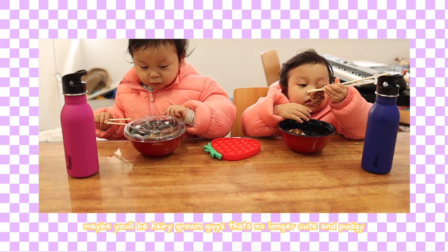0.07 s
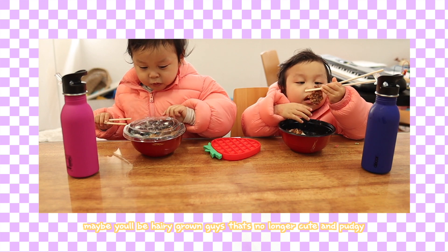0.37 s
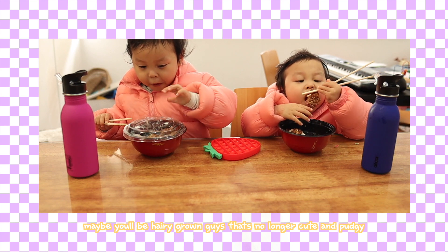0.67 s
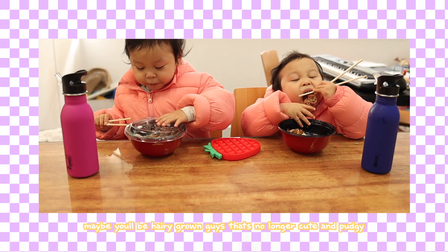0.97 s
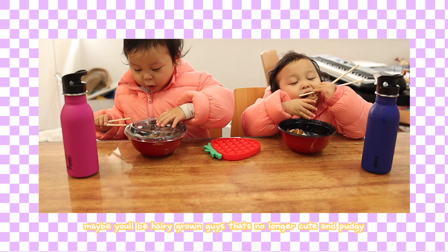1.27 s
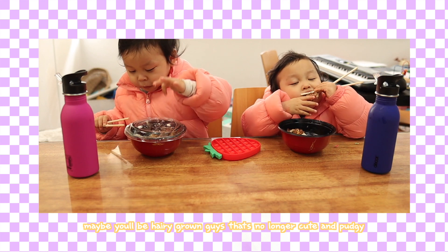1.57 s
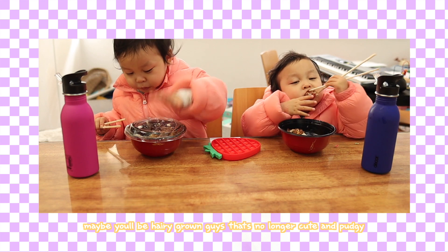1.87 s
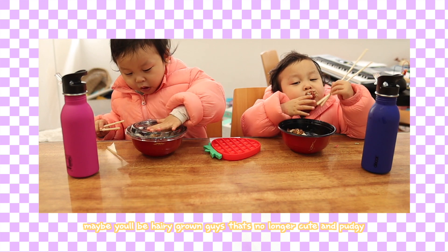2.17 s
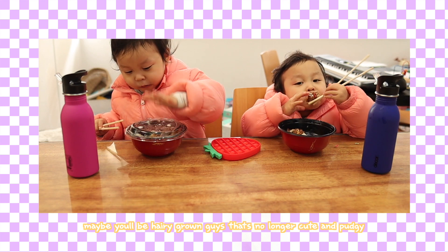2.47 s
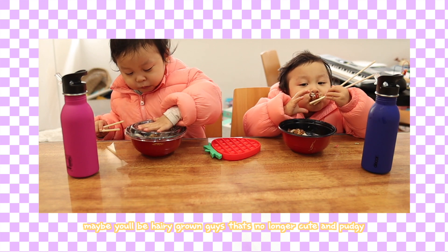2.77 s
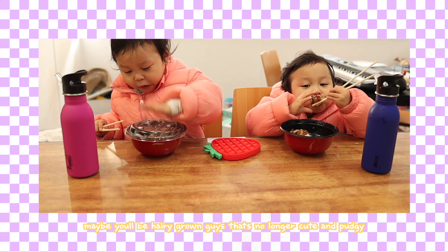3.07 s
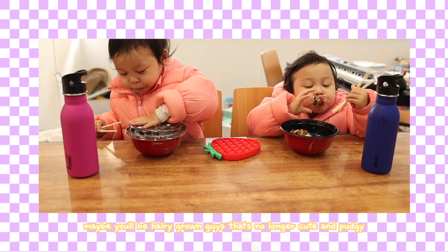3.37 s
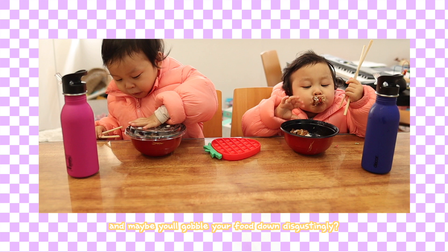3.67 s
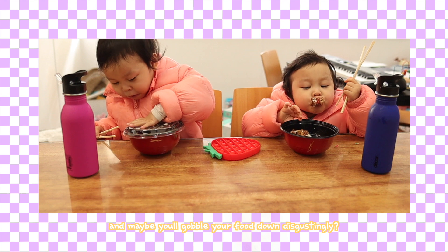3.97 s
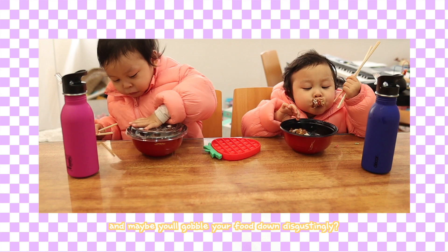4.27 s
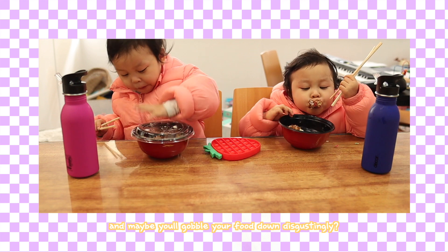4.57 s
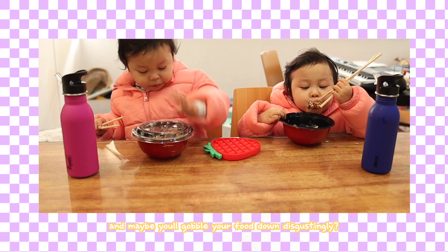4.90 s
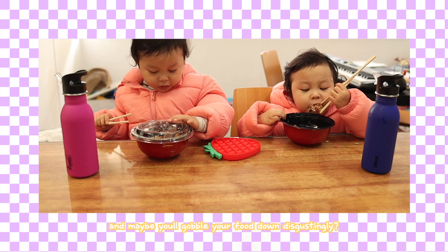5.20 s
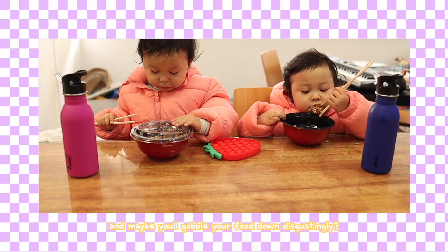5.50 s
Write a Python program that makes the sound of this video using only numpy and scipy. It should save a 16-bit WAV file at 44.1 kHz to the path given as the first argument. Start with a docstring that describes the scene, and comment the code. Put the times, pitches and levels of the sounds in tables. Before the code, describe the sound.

A close microphone picks up a thin plastic lid on a bowl in a small, lively room with faint steady air noise. Fingertips tap and pop the lid at about 0.3 seconds, then tap and scuff it around 1 second, ending in a firmer knock. Small, dry eating clicks fall in between. Loud slaps land at 2.0, 2.7 and 3.3 seconds: each is a plastic crack with a hollow thump from the wooden table and quick after-knocks as the bowl rocks. The second has a buzzing rim rattle. From 3.6 to 4.8 seconds it is quieter, with soft swishes of a padded sleeve, eating clicks and light touches, while a low machine hum rises slightly. A fourth slap at 5.0 seconds crackles a little longer and rattles. Sharp little ticks and chirps follow at 5.2 seconds, then faint squeaks and clicks near 5.6.

```python
"""A small live room, where a child slaps and presses the thin plastic lid of a bowl on a wooden table.
In a slap the fingers land one after another, the lid buckles, the table booms, the bowl rocks back
and the rim rattles. Between slaps fingertips tap and scuff the lid, a padded sleeve swishes and
eating makes small ticks, with faint squeaks over room air and a low machine hum."""
import sys
import numpy as np
from scipy import signal
from scipy.fft import rfft, irfft, next_fast_len
from scipy.io import wavfile
from scipy.ndimage import uniform_filter1d

SR = 44100
rng = np.random.default_rng(int(sys.argv[2]) if len(sys.argv) > 2 else 0)


def transcribe(signal):
    """Save signal, clipped to [-1, 1], as a 16-bit WAV file at the path in sys.argv[1]."""
    frames = np.atleast_2d(signal).T
    limited = np.clip(frames, -1, 1)
    pcm = np.round(limited * 32767).astype(np.int16)
    wavfile.write(sys.argv[1], SR, pcm)


N = 253134
T = np.arange(N) / SR
NOTE_T60_S = 0.27  # the low note ringing after a hit: the bowl's hollow tone or the table's boom

# light fingertip touches, each a tap and a scuff: start_s, knock_db, knock_hz, crack_db, scuff_db
TOUCHES = [(0.262, -33, 980, -43, -42), (0.279, -25.5, 995, -27, -42), (0.296, -27, 800, -48, -55),
           (0.396, -45, 895, -48, -67), (0.7438, -33.5, 890, -48, -46), (0.931, -36, 620, -39, -34),
           (0.962, -31, 550, -45, -37), (0.9944, -25, 600, -59, -60), (1.022, -32, 660, -47, -56),
           (1.0572, -32, 800, -57, -71), (1.0838, -15.5, 784, -24.5, -59), (1.4425, -34, 475, -67, -62),
           (1.71, -39, 520, -57, -67), (2.2247, -35.5, 800, -35.5, -58), (2.36, -36, 487, -45, -46),
           (2.406, -26, 503, -44, -34.5), (3.037, -33, 470, -56, -36), (3.137, -36, 570, -51, -66),
           (3.825, -38, 644, -61, -53), (4.472, -38, 550, -58, -42), (4.57, -34, 630, -47, -40.5),
           (4.579, -33, 590, -51, -61), (4.702, -27.5, 700, -55, -42.5), (5.0031, -28, 700, -33, -45),
           (5.412, -36, 340, -56.5, -58)]


def undb(db):
    """Decibels to gain."""
    return 10 ** (np.asarray(db) / 20)


def unit(x):
    """Scale to rms 1."""
    return x / np.sqrt(np.mean(x ** 2))


def curve_at(points, hz):
    """Read (Hz, value) points on a log-frequency axis."""
    freqs, values = np.transpose(points)
    return np.interp(np.log(hz + 1), np.log(freqs), values)


def colour(x, points):
    """Minimum-phase EQ along a (Hz, dB) curve: nothing rings ahead of an attack."""
    size = 2048
    cepstrum = irfft(np.log(undb(curve_at(points, np.fft.rfftfreq(size, 1 / SR)))))
    cepstrum[1:size // 2] *= 2
    cepstrum[size // 2 + 1:] = 0
    return signal.fftconvolve(x, irfft(np.exp(rfft(cepstrum))))[:len(x)]


def shade(x, points):
    """Zero-phase EQ along a (Hz, dB) curve."""
    size = next_fast_len(N, True)
    gain = undb(curve_at(points, np.fft.rfftfreq(size, 1 / SR)))
    return irfft(rfft(x, size) * gain, size)[:N]


def resonate(x, hz, q):
    """Two-pole band-pass."""
    w = 2 * np.pi * min(hz, SR / 3) / SR
    a = np.sin(w) / (2 * q)
    return signal.lfilter([a, 0, -a], [1 + a, -2 * np.cos(w), 1 - a], x)


def lowpass(x, hz):
    """Two-pole treble cut."""
    return signal.lfilter(*signal.butter(2, min(hz, SR * .45), fs=SR), x)


def highpass(x, hz):
    """Two-pole bass cut."""
    return signal.lfilter(*signal.butter(2, hz, "high", fs=SR), x)


def fade(t, t60):
    """Decay by 60 dB in t60 seconds."""
    return np.exp(-np.log(1000) * t / t60)


def add(track, start_s, sound):
    """Mix a sound into a track."""
    i = max(int(start_s * SR), 0)
    track[..., i:i + sound.shape[-1]] += sound[..., :N - i]


def wander(rate_hz):
    """Smooth random drift of rms 1."""
    hold = int(SR / rate_hz)
    steps = np.repeat(rng.standard_normal(N // hold + 1), hold)
    return unit(uniform_filter1d(uniform_filter1d(steps, hold), hold)[:N])


def swell(peak_s, db, rise_s, fall_s):
    """Envelope of one movement: up 20 dB in rise_s to its peak, down 20 dB in fall_s."""
    return undb(db - 20 * np.maximum((peak_s - T) / rise_s, (T - peak_s) / fall_s))


def damped_note(hz, t60, rise_s=0.00074):
    """A dying sine with a softened attack."""
    t = T[:SR // 2]
    return np.sin(2 * np.pi * hz * t) * fade(t, t60) * (1 - np.exp(-t / rise_s))


def room_tone(air_db=-47.5, air_drift_db=1.87, hum_drift_db=3.0):
    """Gently drifting room air and a low, wavering machine hum."""
    # colour of the air: freq_hz, gain_db
    air_eq = [(12, -27), (20, -1), (59, 2), (128, 4), (249, -2.5), (603, -6.5), (753, -8.5), (889, -9.5),
              (1390, -13.5), (1830, -15), (9110, -38), (11100, -35.5), (12700, -44), (15000, -73)]
    # tones of the hum: pitch_hz, level_db
    hum_tones = [(71, -2), (117, -7.5)]
    # fader of the hum: time_s, level_db
    hum_fader = [(0, -61), (2.5, -63), (3.6, -56.5), (4.8, -50.5), (5.74, -51.5)]
    air = unit(shade(rng.standard_normal(N), air_eq))
    hum = 0
    for hz, db in hum_tones:
        gain = undb(db + hum_drift_db * wander(6))
        hum += gain * unit(np.sin(2 * np.pi * hz * T + 0.27 * wander(4)))
    hum *= undb(np.interp(T, *np.transpose(hum_fader)))
    return air * undb(air_db + air_drift_db * wander(5.137)) + hum


def smooth_tail(tail, fine_hz=24, broad_hz=300):
    """Level out narrow peaks in a one-second echo, so the walls add no pitch of their own."""
    spectrum = rfft(tail)
    fine, broad = (uniform_filter1d(np.abs(spectrum) ** 2, width) for width in (fine_hz, broad_hz))
    return irfft(spectrum * np.sqrt(np.abs(broad / fine)), SR)[:SR // 2]


def room_reverb(x, gap_s=0.0015, build_s=0.0048):
    """Diffuse wall echoes build up after a short gap; the highest treble dies first."""
    # reverb bands: centre_hz, t60_s, level_db
    bands = [(97, 0.26, 7), (220, 0.3, -3), (340, 0.45, -1.5), (800, 0.39, -5.5), (1820, 0.41, -2.5),
             (2690, 0.45, -4), (4300, 0.4, -4), (8000, 0.38, -7.5), (12500, 0.19, -5.5)]
    t, centres = T[:SR], np.array(bands)[:, 0]
    noise, freqs = rfft(rng.standard_normal(SR)), np.arange(SR // 2 + 1)
    tail = 0
    for share, (_, t60, db) in zip(np.eye(len(bands)), bands):
        envelope = fade(t, t60) * np.clip((t - gap_s) / build_s, 0, 1)
        band = irfft(noise * curve_at(np.c_[centres, share], freqs), SR)
        tail += undb(db) * band * envelope / np.sqrt(np.sum(envelope ** 2))
    return signal.fftconvolve(x, smooth_tail(tail))[:N]


def squeaks(waver=0.0124, flutter_db=3.5, rasp=0.23):
    """Raspy stick-slip tones swell and fade, wavering in pitch and level."""
    # faint squeaks and two sharp chirps: peak_s, length_s, pitch_hz, level_db
    slips = [(0.035, 0.12, 2690, -59), (0.12, 0.036, 840, -49), (0.71, 0.15, 2550, -62),
             (5.2062, 0.0044, 4190, -29.5), (5.212, 0.0038, 4100, -28), (5.54, 0.06, 2590, -58.5),
             (5.608, .08, 2090, -66), (5.62, 0.12, 2700, -62), (5.66, 0.22, 2480, -57)]
    warped_time = np.cumsum(1 + waver * wander(220)) / SR
    flutter = undb(flutter_db * wander(90))
    out, rub = np.zeros(N), rng.standard_normal(N)
    for peak_s, length_s, hz, db in slips:
        tone = np.sin(2 * np.pi * hz * warped_time) + rasp * unit(resonate(rub, hz, q=5))
        out += undb(db) * np.exp(-(2 * (T - peak_s) / length_s) ** 2) * tone
    return out * flutter


def eating_ticks(snap_hz=9800, snap_t60_s=0.0084):
    """Dry clicks: an impulse in a small damped resonance, with a bright snap on top."""
    # ticks of eating: start_s, level_db, pitch_hz, resonance_q, snap_share
    ticks = [(0.4058, -43, 12500, 3, 0.5), (0.511, -47, 7050, 1.1, 0.9), (0.5144, -27.5, 2790, 1.9, 0.7),
             (0.943, -29, 5200, 2.6, 0.3), (0.9445, -32, 7000, 2.4, 0.3), (3.6928, -36, 3300, 1.3, 0.5),
             (3.694, -27, 3540, 0.99, .4), (3.707, -31, 3500, 1.3, 0.5), (3.751, -30.5, 7300, 8.3, 0.65),
             (4.2438, -30, 3150, 1.6, 0.27), (4.499, -33.5, 2880, 3, .05), (5.2045, -37, 4050, 4.9, .7),
             (5.2108, -30, 4100, 3.6, 0.75), (5.2275, -28, 3300, 2, 0), (5.2423, -20.5, 2920, 2.7, 0.14),
             (5.628, -42, 2920, 3.5, .05), (5.6753, -33, 2620, 0.68, 0.56), (5.6777, -36, 2200, 2.3, .3)]
    out, t = np.zeros(N), T[:SR // 50]
    for start_s, db, hz, q, snap_share in ticks:
        body = resonate(resonate(1.0 * (t == 0), hz, q), hz, q)
        snap = resonate(rng.standard_normal(len(t)) * fade(t, snap_t60_s), snap_hz, q=3.5)
        tick = body / np.abs(body).max() + snap_share * snap / np.abs(snap).max()
        add(out, start_s, undb(db) * tick)
    return out


def friction(rate_hz, spread_db, hiss):
    """Countless tiny slips of uneven size, blurring into hiss."""
    slips = (rng.random(N) < rate_hz / SR) * rng.standard_normal(N)
    sizes = undb(spread_db * np.minimum(rng.exponential(size=N), 4))
    return unit(slips * sizes) + hiss * rng.standard_normal(N)


def sleeve(crinkle_db=-6, crinkle_hz=2800):
    """Nylon slides and crinkles at every stroke of the arm."""
    # arm strokes: peak_s, level_db, rise_s, fall_s
    strokes = [(0.55, -61.5, 0.14, 0.22), (0.85, -58, 0.19, 0.14), (1.55, -63.5, 0.86, 0.95),
               (1.96, -54, 0.1, 0.15), (2.21, -58, 0.04, 0.061), (2.56, -64, 0.25, 0.46),
               (3.07, -60.5, 0.25, 1), (3.746, -45.5, 0.34, 0.091), (4.37, -46.5, 0.091, 0.14),
               (4.68, -56, 0.7, 0.13), (4.92, -58.5, 0.5, 0.99), (5.27, -66, 0.14, 0.81)]
    # colour of the swish: freq_hz, gain_db
    swish_eq = [(500, -7.5), (1500, 7.5), (3000, 6.5), (6000, 3.5), (9000, 1.5), (11500, 0), (13000, -15),
                (15500, -23)]
    motion = sum(swell(*stroke) for stroke in strokes)
    swish = unit(colour(friction(rate_hz=3400, spread_db=2.5, hiss=1.9), swish_eq))
    creases = friction(rate_hz=340, spread_db=0.5, hiss=0.1)
    crinkle = unit(resonate(resonate(creases, crinkle_hz, q=2.8), crinkle_hz, q=0.42))
    return (swish + undb(crinkle_db) * crinkle) * motion


def finger_scuffs(gain_db=-4):
    """Fingertips stick and slip on the lid at every touch."""
    # colour of skin on plastic: freq_hz, gain_db
    scuff_eq = [(150, -24), (450, 4), (700, 0), (950, -2), (1300, -9), (1750, -6), (3000, -12),
                (5500, -17.5), (8500, -26), (11500, -27), (14000, -47)]
    pressure = sum(swell(s, db, rise_s=0.029, fall_s=0.095) for s, *_, db in TOUCHES)
    scuff = unit(colour(friction(rate_hz=900, spread_db=3.0, hiss=1.0), scuff_eq))
    return undb(gain_db) * scuff * pressure


def rim_rattle(rate_hz=105, uneven=0.24, spread_db=1.5, gain_db=4):
    """The loose lid strikes the rim of the bowl in a quick, uneven run of dry snaps."""
    # bursts of rattling: peak_s, level_db, rise_s, fall_s
    bursts = [(2.70, -30, 0.055, 0.064), (2.765, -20.5, 0.11, 0.15), (5.09, -35, 0.046, 0.049)]
    snaps, t = np.zeros(N), T[:SR // 50]
    gaps, sizes = rng.standard_normal((N // 200, 2)).T
    for start_s, size in zip(np.cumsum(np.exp(uneven * gaps) / rate_hz), sizes):
        if start_s < T[-1]:
            add(snaps, start_s, undb(spread_db * size) * rng.standard_normal(len(t)) * fade(t, 0.017))
    rattle = lowpass(resonate(snaps, hz=2650, q=1.2), hz=5000)
    return undb(gain_db) * rattle * sum(swell(*burst) for burst in bursts)


def dome_pops(detune=0.016):
    """The lid's dome snaps through and rings, a little differently under each fingertip."""
    # pops: start_s, level_db
    pops = [(0.2635, -36), (0.274, -29.5), (0.2955, -33.5), (1.0835, -30)]
    # modes of the dome: pitch_hz, level_db, t60_s
    modes = [(630, -8, 0.19), (686, -3.5, 0.15), (800, -21, 0.056), (945, 1.5, 0.12), (1010, -7.5, 0.16),
             (1080, -20, 0.12), (1806, -6, 0.092)]
    out = np.zeros(N)
    for start_s, db in pops:
        for (hz, mode_db, t60), shift in zip(modes, rng.standard_normal(len(modes))):
            ring = damped_note(hz * (1 + detune * shift), t60, rise_s=0.00035)
            add(out, start_s, undb(db + mode_db) * ring)
    return out


def bowl_ring(pushes, gain_db=-58):
    """Each push sets the bowl and the table top ringing together."""
    # modes of bowl and table: pitch_hz, level_db, t60_s
    modes = [(359, 14, 0.23), (444, 8, 0.092), (525, -11, 0.41), (577, 16.5, 0.11), (700, -8, 0.21),
             (753, -6, 0.24), (1065, 5, 0.24), (1217, 12.5, 0.08), (1250, -6, 0.3), (1676, 16.5, 0.2),
             (1875, 12, 0.15)]
    t = T[:SR]
    ring = sum(undb(db) * fade(t, t60) * np.sin(2 * np.pi * hz * t) for hz, db, t60 in modes)
    return undb(gain_db) * signal.fftconvolve(pushes, ring)[:N]


def knock(hz, q):
    """Two rows: a push, shorter for a harder contact, and the body of flexing wall and hollow bowl."""
    t = T[:SR // 5]
    wall, cavity = rng.standard_normal((2, len(t)))
    flex = 0.1 * wall * fade(t, t60=0.046)
    hollow = 0.099 * resonate(cavity * fade(t, t60=0.12), hz, q=5)
    rows = resonate(resonate(np.array([t == 0, flex + hollow]), hz, q), hz, q=0.51)
    return rows / np.abs(rows[0]).max()


def lid_crack(knock_hz, bright_hz, buzz_t60_s=0.07, snap_t60_s=0.019, uneven_db=3):
    """The lid buckles with a snap, then chatters against the rim; a tighter lid gives less bass."""
    t = T[:SR // 5]
    chatter = undb(uneven_db * np.repeat(rng.standard_normal(len(t)), 64)[:len(t)])
    envelope = fade(t, snap_t60_s) + 0.11 * chatter * fade(t, buzz_t60_s)
    burst = rng.standard_normal(len(t)) * envelope
    return lowpass(highpass(burst, 0.21 * knock_hz), bright_hz)


def contact(knock_db, knock_hz, crack_db, bright_hz, q=1.0):
    """One hit as three rows: push, body and lid crack."""
    return np.vstack([undb(knock_db) * knock(knock_hz, q),
                      undb(crack_db) * lid_crack(knock_hz, bright_hz)])


def taps(hits, q):
    """Single hits, each leaving a low ringing note of bowl or table; returns contacts and notes."""
    contacts, notes = np.zeros((3, N)), np.zeros(N)
    for start_s, knock_db, knock_hz, crack_db, bright_hz, note_db, note_hz in hits:
        add(contacts, start_s, contact(knock_db, knock_hz, crack_db, bright_hz, q))
        add(notes, start_s, undb(note_db) * damped_note(note_hz, NOTE_T60_S))
    return contacts, notes


def finger_taps(bright_hz=10800, hollow_db=-22.5):
    """Fingertips tap the lid; the covered bowl answers softly at the pitch of each knock."""
    hits = [(s, db, hz, crack_db, bright_hz, db + hollow_db, hz) for s, db, hz, crack_db, _ in TOUCHES]
    return taps(hits, q=1.24)


def after_knocks():
    """Short after-knocks follow each slap as the lid rattles or the bowl rocks."""
    # after-knocks: start_s, knock_db, knock_hz, crack_db, bright_hz, note_db, note_hz
    hits = [(2.001, -12.5, 700, -19, 3500, -27, 359), (2.0298, -10, 860, -9.5, 8850, -32, 588),
            (2.038, -32, 1090, -20, 6000, -38, 760), (2.0721, -10.5, 734, -18.5, 3000, -26, 752),
            (2.7232, -28, 600, -26, 3600, -21, 359), (2.7364, -15, 930, -19, 3000, -30.5, 569),
            (2.758, -23, 890, -22.5, 3200, -34, 1010), (3.3574, -11.5, 910, -14, 3000, -28, 517),
            (3.387, -30, 900, -22, 3530, -45, 444), (3.416, -28, 1310, -33, 2500, -47, 700),
            (3.4756, -19.5, 514, -37, 3000, -35, 507), (5.115, -21.5, 800, -27, 2300, -34.5, 447),
            (5.121, -24, 550, -41, 2500, -31.5, 114), (5.132, -27, 700, -26, 5330, -39, 359),
            (5.177, -36, 332, -50, 2960, -52, 352)]
    return taps(hits, q=0.76)


def slaps(fingers=5, scatter=0.1, falloff_db=2, last_crack_offset_db=-10.5):
    """Fingers land in quick succession, the lid buckles, the table booms; returns contacts and notes."""
    # slaps: start_s, finger_gap_s, knock_db, first_finger_hz, last_finger_hz, first_crack_db,
    # buckle_delay_s, buzz_t60_s, buckle_db, bright_hz, note_db, note_hz, boom_db, boom_hz
    blows = [(1.9774, 0.0038, -9, 429, 900, -13.5, 0.014, 0.12, -9, 11200, -17, 700, -18.5, 165.5),
             (2.664, 0.002, -12.5, 460, 800, -25.5, 0.0052, 0.13, -3.5, 9400, -23.5, 359, -29, 125),
             (3.3419, .003, -9.5, 416, 1960, -20.5, .0063, 0.13, -8.5, 4040, -21, 437, -21.5, 124),
             (5.0097, .0026, -11.5, 930, 1940, -21.5, 0.0085, 0.36, -6, 2900, -22, 673, -23, 214)]
    contacts, notes = np.zeros((3, N)), np.zeros(N)
    for (start_s, gap_s, knock_db, first_hz, last_hz, first_crack_db,
         delay_s, buzz_t60_s, buckle_db, bright_hz, note_db, note_hz, boom_db, boom_hz) in blows:
        pitches = np.geomspace(first_hz, last_hz, fingers)  # each finger meets a tighter lid
        cracks_db = np.linspace(first_crack_db, buckle_db + last_crack_offset_db, fingers)
        for finger, jitter in enumerate(scatter * rng.standard_normal(fingers)):
            force_db = knock_db - falloff_db * abs(finger - fingers // 2)  # middle finger hits hardest
            hit = contact(force_db, pitches[finger], cracks_db[finger], bright_hz)
            add(contacts, start_s + (finger + jitter) * gap_s, hit)
        buckle = undb(buckle_db) * lid_crack(pitches[fingers // 2], bright_hz, buzz_t60_s)
        add(contacts[2], start_s + delay_s, buckle)
        hollow = undb(note_db) * damped_note(note_hz, NOTE_T60_S)
        boom = undb(boom_db) * damped_note(boom_hz, t60=0.15)
        add(notes, start_s + gap_s, hollow + boom)
    return contacts, notes


def bowl(knock_gain_db=-1):
    """Slaps, after-knocks and taps hit the bowl and crack the lid; returns clatter and ring-out."""
    # colour of the thin lid: freq_hz, gain_db
    lid_eq = [(400, 10.5), (1200, 6), (2500, 4.5), (4200, 2), (5500, 1.5), (7000, -1), (8500, -6.5),
              (11300, 1), (13000, -8.5), (15500, -41)]
    contacts, notes = zip(slaps(), after_knocks(), finger_taps())
    pushes, bodies, cracks = sum(contacts)
    lid = colour(cracks, lid_eq) + rim_rattle() + dome_pops()
    return undb(knock_gain_db) * (pushes + bodies) + lid, sum(notes) + bowl_ring(pushes)


def scene(direct_side_db=-4, small_send_db=-8, lean_left_db=0.16):
    """Table sounds, their echoes and the room tone in mid and side, at a close microphone pair."""
    # width of the table sounds and echoes: freq_hz, side_gain_db
    width = [(60, -25), (125, -43), (250, -20), (500, -10.5), (1000, -3.5), (2000, 0), (4000, 5),
             (7000, 5.5), (11500, 10)]
    # width of the room tone: freq_hz, side_gain_db
    air_width = [(60, -34), (125, -12.5), (250, -2), (500, -1.5), (1000, 2), (4000, 5), (11500, 8)]
    # in-phase side share that draws the bowl left: freq_hz, side_gain_db
    bowl_left = [(300, -27), (1200, -35), (4000, -13), (9000, -12)]
    clatter, ring_out = bowl()
    handling = highpass(clatter + finger_scuffs() + sleeve(), hz=205)  # a small bowl has little bass
    small_sounds = eating_ticks() + squeaks()
    direct = handling + ring_out + small_sounds
    send = handling + undb(small_send_db) * small_sounds
    mid = direct + room_reverb(send) + room_tone()
    # the pair's difference is a pressure gradient: a quarter cycle ahead, stronger in the treble
    gradient = -np.imag(signal.hilbert(direct, next_fast_len(N)))[:N]
    side = shade(undb(direct_side_db) * gradient + room_reverb(send), width)
    side += shade(room_tone(), air_width) + shade(handling, bowl_left)
    return np.array([(mid + side) * undb(lean_left_db), (mid - side) * undb(-lean_left_db)])


def record(dry):
    """The hardest slap clips at full scale, and a steep low-pass cuts the top."""
    top_cut = signal.ellip(8, .2, 70, 15800, fs=SR, output="sos")
    return signal.sosfilt(top_cut, np.clip(dry, -1, 1))


dry = scene()
out = record(dry)
transcribe(out)
```